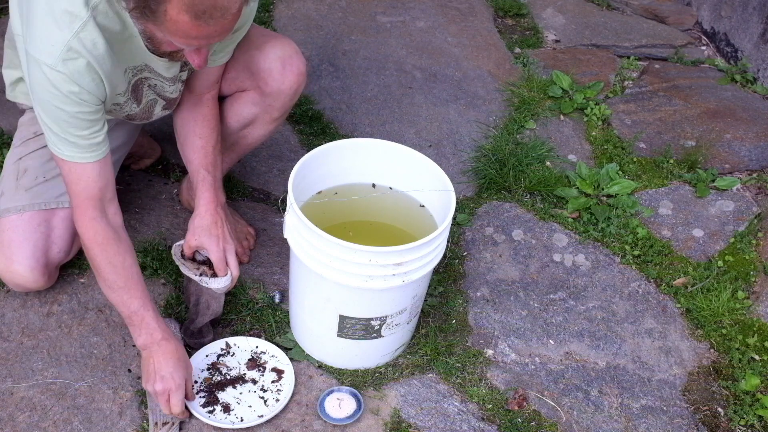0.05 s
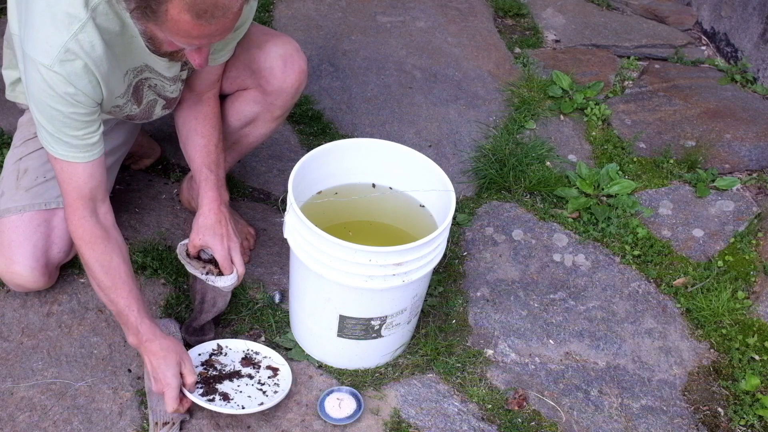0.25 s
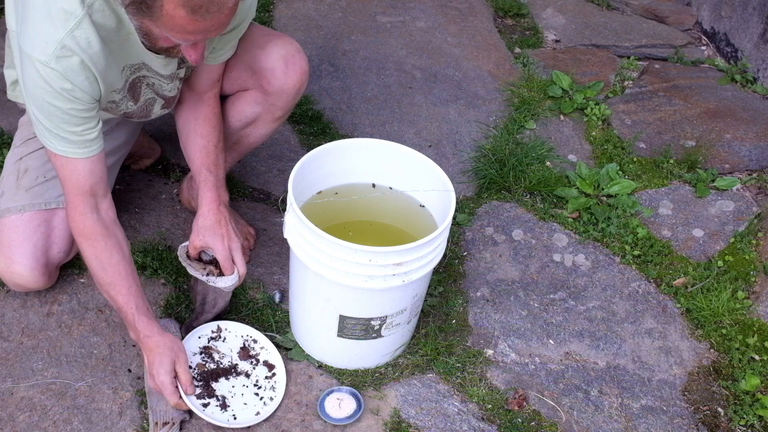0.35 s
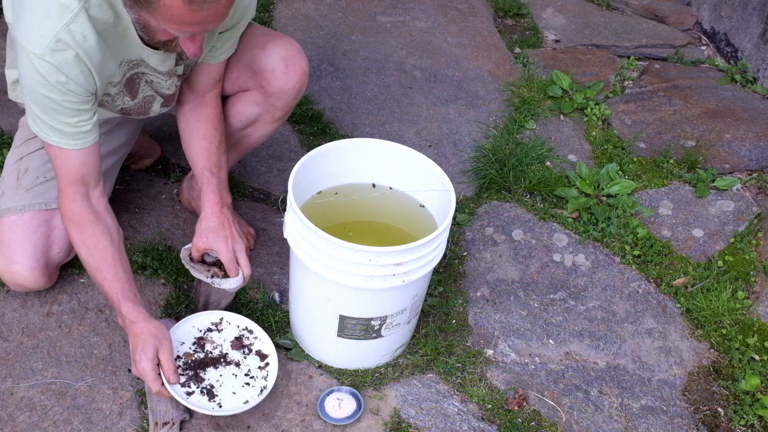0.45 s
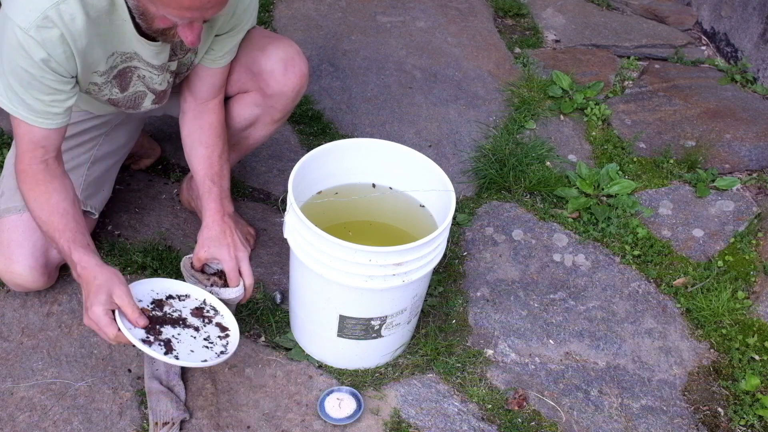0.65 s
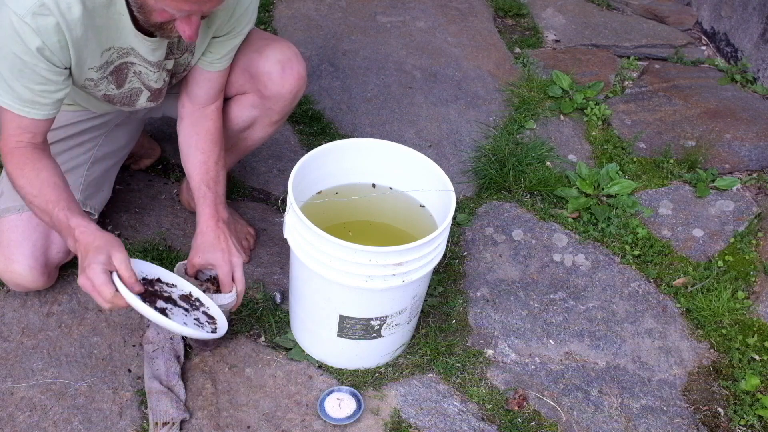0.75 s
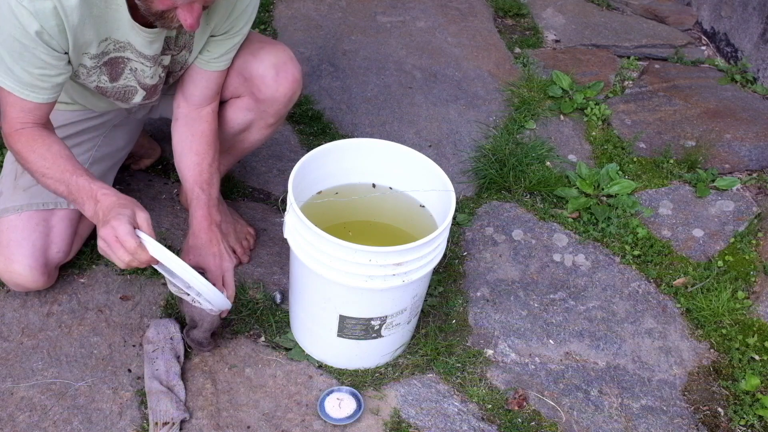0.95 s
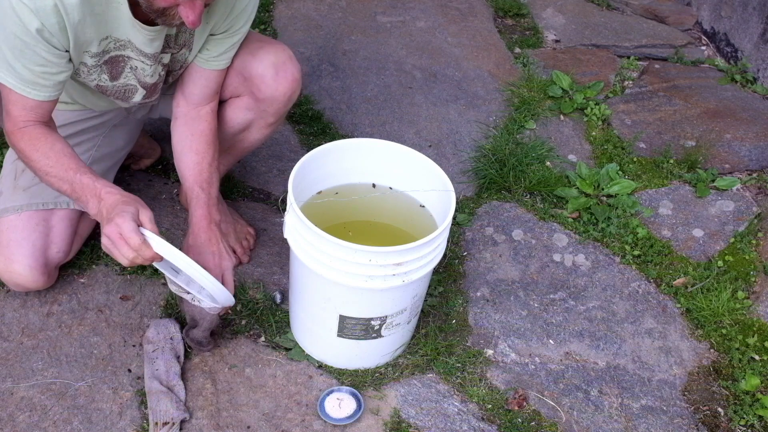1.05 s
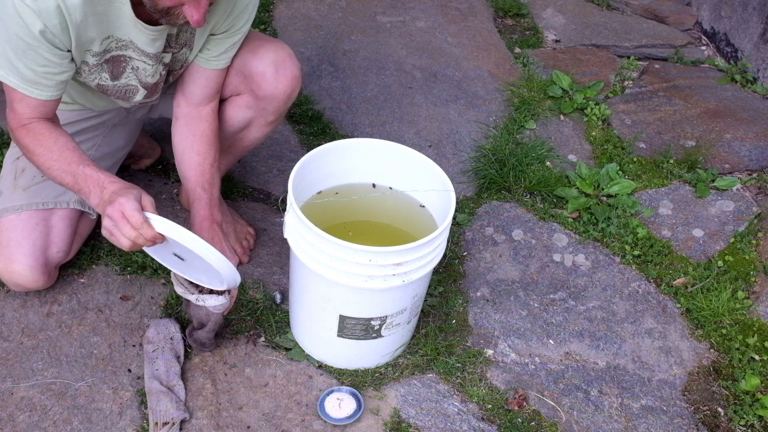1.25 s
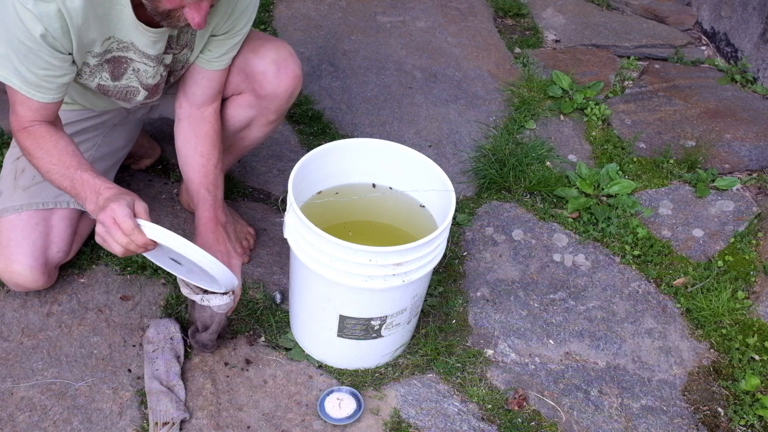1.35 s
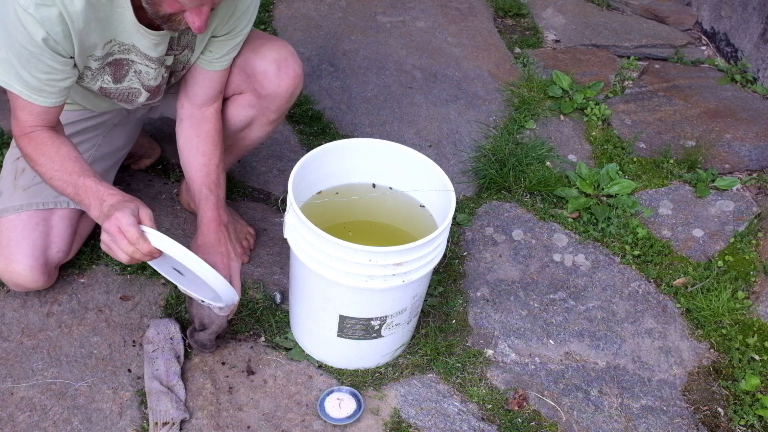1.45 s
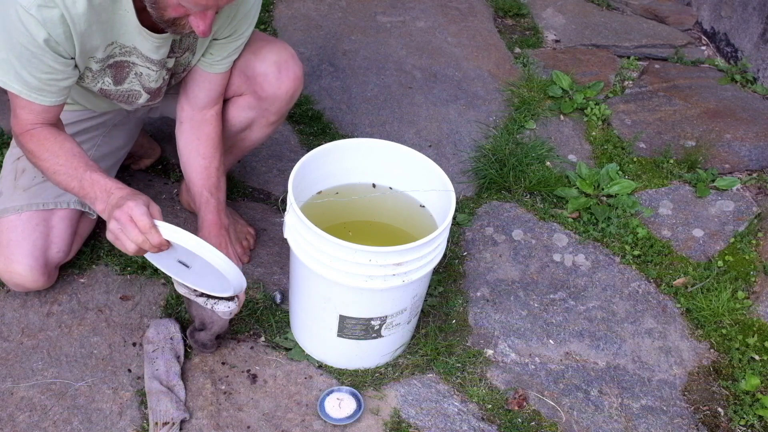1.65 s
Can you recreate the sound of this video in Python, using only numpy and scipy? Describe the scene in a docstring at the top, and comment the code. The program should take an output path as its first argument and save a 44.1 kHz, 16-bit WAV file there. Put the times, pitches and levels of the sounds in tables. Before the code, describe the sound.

A ceramic plate rocks and drags on stone paving, giving a quick cluster of ringing clinks with a gritty scrape. Afterwards, crumbs slide very faintly off it and tick into a plastic cup. Close by, in a quiet garden.

```python
"""Ceramic plate lifted off stone paving.

In a quiet garden the plate rocks and drags on its foot, then tips onto its rim. Each contact gives a dull
knock and restarts its ringing; grit grinds underneath and walls answer faintly. Damp crumbs then slide
off the tilted plate and tick into a plastic cup."""
import sys
import numpy as np
from scipy import signal
from scipy.fft import rfft, irfft
from scipy.io import wavfile

SR = 44100
rng = np.random.default_rng(int(sys.argv[2]) if len(sys.argv) > 2 else 0)


def wav_out(sig):
    """Save sig, one row per channel (or a flat mono array), as 16-bit PCM at SR to the path in sys.argv[1]."""
    wavfile.write(sys.argv[1], SR, np.round(np.clip(np.atleast_2d(sig).T, -1, 1) * 32767).astype(np.int16))


N = 74970
T = np.arange(N) / SR

# Plate on stone, last row a hand gripping the plate: start_s, knock_db, knock_hz, low_ring_db, middle_ring_db,
# high_ring_db, tilt (1 = rim)
CONTACTS = [(0.124, -63, 885, -52, -52, -76, 0.4), (.1432, -24.5, 930, -39.5, -46, -55, 1),
            (0.1526, -25.5, 1300, -38.5, -41, -58, 0.85), (0.1636, -23.5, 860, -75, -45, -60, 0),
            (0.1733, -42, 1100, -39, -40.5, -53, 0.8), (0.216, -21.5, 833, -35.5, -44, -50, 0.03),
            (0.2376, -17.5, 880, -30, -42, -39.5, 0.1), (0.2435, -18, 1500, -28.5, -23, -46.5, 0.77),
            (0.2549, -5, 1110, -21, -31.5, -31, 0.17), (0.2611, -5.5, 1204, -12.5, -22, -39, 0.1),
            (0.2677, -14, 1350, -10.5, -21, -34.5, 0.12), (.284, -7, 1350, -24.5, -25, -40, 0),
            (0.3002, -11, 926, -34, -29.5, -38.5, 0), (0.3073, -22, 1250, -40, -28.5, -77, 0),
            (0.3241, -13.5, 1170, -17.5, -19.5, -33, 0.48), (0.331, -32, 1200, -16.5, -33, -34.5, 0),
            (0.3416, -31, 1000, -26.5, -36, -37.5, 0.11), (0.3618, -15.5, 750, -28, -27, -37.5, 0.45),
            (0.3767, -6.5, 826, -18, -25, -33, 0.6), (0.3901, -12.5, 810, -15, -34, -38, 0.67),
            (0.4107, -14, 810, -23.5, -33.5, -45.5, 0.99), (0.446, -53, 710, -36, -46, -63, 1.0)]
# Upper plate modes: pitch_hz, foot_db, rim_change_db, t60_s, pan_db (left minus right)
HIGH_MODES = [(3682, -26, 8, .1, 5), (4124, -18, 0, .12, 7), (4762, 1, 1, .18, 11), (5540, -18, 5, .18, 8),
              (5900, -16, 1, .15, 10), (7050, -11, 2, .22, 10), (7850, -21, 8, .12, 8),
              (8285, -23, 6, .12, 7), (9378, -18, 8, .15, 7), (10130, -21, 0, .1, 12),
              (10400, -17, 2, .12, 12), (10780, -20, 8, .1, 12), (10970, -19, -2, .14, 12),
              (11746, -20, 7, .12, 12), (12950, -20, 0, .12, 9), (13227, -20, 2, .12, 10),
              (13930, -22, 2, .1, 10), (14160, -27, 7, .1, 10)]


def from_db(db):
    """Decibels to gain."""
    return 10 ** (np.asarray(db) / 20)


def unit_rms(x):
    """Scale to unit power."""
    return x / np.sqrt(np.mean(x ** 2) + 1e-20)


def decay(age_s, t60_s):
    """Exponential fall, 60 dB in t60_s."""
    return np.exp(-np.log(1000) * age_s / t60_s)


def per_bin(curve):
    """Interpolate (freq_hz, value) rows onto the FFT bins, in log frequency."""
    hz, value = np.transpose(curve)
    return np.interp(np.log(np.arange(N // 2 + 1) * SR / N + 1), np.log(hz), value)


def colour(x, spectrum):
    """Shape noise by (freq_hz, level_db) rows, at unit power."""
    return unit_rms(irfft(rfft(x) * from_db(per_bin(spectrum)), N))


def butter(x, hz, kind, order=2):
    """Causal Butterworth filter."""
    return signal.sosfilt(signal.butter(order, hz, kind, fs=SR, output="sos"), x + 1e-18)


def pan(x, pan_db):
    """Place a sound to the left: louder and slightly earlier there."""
    # Left lead between the microphone ports: freq_hz, phase_rad
    left_lead = [(200, 0.017), (1300, 0.42), (4500, 1.03), (11000, 1.56)]
    right = irfft(rfft(x) * np.exp(-1j * per_bin(left_lead)), N)
    gains = from_db([pan_db / 2, -pan_db / 2])
    return np.array([x, right]) * (gains / gains.mean())[:, None]


def grains(rate_per_s=5000, spread_db=2.5):
    """Dense stream of tiny, uneven clicks."""
    sizes = from_db(spread_db * np.minimum(rng.exponential(1, N), 4))
    return sizes * rng.choice([-1, 1], N) * (rng.random(N) < rate_per_s / SR)


def garden_air(level_db=-53):
    """Steady distant outdoor rush, wider in the treble."""
    # Background spectrum: freq_hz, level_db
    spectrum = [(15, -45), (25, -11.5), (152, -3.5), (233, -5), (297, -2), (349, -3.5), (482, -3.5),
                (666, -5.5), (722, -4), (945, -8.5), (1380, -12.5), (1900, -13), (15500, -31)]
    # Left-right likeness: freq_hz, correlation
    likeness = [(30, 0.45), (120, 0.19), (300, 0.56), (700, 0.6), (2000, 0.19), (5000, 0.175), (12000, .1)]
    mid, side = rfft(rng.standard_normal((2, N)))
    correlation = per_bin(likeness)
    stereo = mid + np.sqrt((1 - correlation) / (1 + correlation)) * side * [[1], [-1]]
    return from_db(level_db) * unit_rms(irfft(stereo * from_db(per_bin(spectrum)), N))


def yard_scatter(x, t60_s=0.22, top_hz=3560):
    """Short diffuse tail off paving, bucket and plants."""
    tail = butter(rng.standard_normal((2, N)), top_hz, "low") * decay(T, t60_s)
    tail += 2 * tail.mean(axis=0)  # narrows the image
    tail *= np.sqrt(2 * top_hz / SR / np.sum(tail ** 2, axis=1, keepdims=True))  # passband gain near 1
    return signal.fftconvolve(x.mean(axis=0)[None], tail, axes=1)[:, :N]


def wall_echoes(x, top_hz=2500):
    """Faint, dull returns from three walls."""
    # Reflections: delay_s, gain_db
    walls = [(.105, -27.5), (0.244, -41.5), (0.291, -47)]
    dull = butter(x.mean(axis=0), top_hz, "low")
    return sum(from_db(db) * np.interp(T - delay_s, T, dull) for delay_s, db in walls)


def crumbs():
    """Crumbs slide over the glaze in soft swells and land with thin ticks."""
    # Slides: centre_s, sigma_s, level_db
    slides = [(0.023, 0.017, -61.5), (1.068, 0.036, -59), (1.304, 0.074, -65.5), (1.53, 0.059, -72)]
    # Sliding hiss: freq_hz, level_db
    slide_spectrum = [(500, -42), (2700, 6.5), (6000, -0.5), (9000, -6), (12500, 2.5), (15500, -22)]
    # Landings in the cup: start_s, level_db, t60_s, pitch_hz, width_hz
    ticks = [(0.562, -45.5, 0.12, 13200, 7000), (1.3072, -36, .012, 11400, 1300),
             (1.311, -40.5, .016, 11800, 1300), (1.339, -41, .012, 12500, 2500),
             (1.355, -45, 0.018, 12200, 4000), (1.504, -53, 0.04, 14000, 4000)]
    swells = sum(from_db(db) * np.exp(-.5 * ((T - centre_s) / sigma_s) ** 2)
                 for centre_s, sigma_s, db in slides)
    out = swells * colour(grains(), slide_spectrum)
    for start_s, db, t60_s, hz, width_hz in ticks:
        band = signal.lfilter(*signal.iirpeak(hz, hz / width_hz, fs=SR), rng.standard_normal(N))
        envelope = (T > start_s) * decay(np.abs(T - start_s), t60_s)
        out += .5 * from_db(db) * unit_rms(band) * envelope
    return pan(out, pan_db=12)


def grinding(rub_db=-4.5, rub_width_hz=60, bottom_hz=131, top_hz=14000):
    """Grit is crushed under the dragging plate and rubs its high modes."""
    # Drag strength: time_s, level_db
    drag_curve = [(0.109, -64), (0.126, -54), (0.174, -48), (0.206, -64), (0.236, -43), (0.258, -37.5),
                  (0.269, -46.5), (.318, -44.5), (.336, -40), (.355, -44), (.38, -39), (0.416, -37),
                  (0.439, -64), (0.481, -58)]
    # Crushed grit: freq_hz, level_db
    grit_spectrum = [(60, -26.5), (200, 5.5), (700, 8.5), (1500, -1.5), (2900, 2), (3700, -11.5),
                     (6500, -15.5), (8800, -31), (10500, -11), (12000, -47), (14000, -42), (14800, -61)]
    time_s, drag_db = np.transpose(drag_curve)
    drag = from_db(np.interp(T, time_s, drag_db)) * (T > time_s[0]) * (T < time_s[-1])
    crush = grains()
    rub = np.zeros(N)
    for hz, foot_db, rim_change_db, *_ in HIGH_MODES:
        gain = from_db((foot_db + rim_change_db / 2) / 2)  # half tilt, dB contrast halved
        rub += gain * signal.lfilter(*signal.iirpeak(hz, hz / rub_width_hz, fs=SR), crush)
    grit = drag * (colour(crush, grit_spectrum) + from_db(rub_db) * unit_rms(rub))
    grit = butter(grit, top_hz, "low", order=12)
    return pan(butter(grit, bottom_hz, "high"), pan_db=5.5)


def knocks(edge_ratio=1.485, bottom_hz=140, top_hz=2550):
    """Each contact pushes out one short, dull pulse of air."""
    out = np.zeros(N)
    for start_s, db, hz, *_ in CONTACTS:
        impulse = signal.unit_impulse(N, int(start_s * SR))
        pulse = butter(impulse, [hz / edge_ratio, hz * edge_ratio], "band")
        pulse = butter(pulse, top_hz, "low", order=4)
        out += from_db(db) * pulse / np.abs(pulse).max()
    return pan(butter(out, bottom_hz, "high"), pan_db=1)  # a small plate radiates no bass


def ringing(rise_s=0.00035, spread_db=1, jolt_rad=0.37):
    """Each contact resets every mode's swing and jolts its phase; between contacts the modes decay."""
    # Low and middle plate modes: pitch_hz, foot_db, rim_change_db, t60_s, pan_db
    low_modes = [(989, -28.5, 31.5, 0.2, 3.5), (1076, -23, -3, .1, 16), (1347.3, 1, 1, 0.17, 4.5)]
    middle_modes = [(2359, 3, -23.5, 0.26, 3), (2681.7, -1.5, 4, 0.12, 8.2), (2722, -13, 18, 0.075, 7.1)]
    start_s, _, _, low_db, middle_db, high_db, tilt = np.transpose(sorted(CONTACTS))
    latest = np.maximum(np.searchsorted(start_s, T) - 1, 0)
    age_s = np.maximum(T - start_s[latest], 0)
    pole = np.exp(-1 / (rise_s * SR))
    lowest_hz = low_modes[0][0]
    out = np.zeros((2, N))
    for modes, strike_db in ((low_modes, low_db), (middle_modes, middle_db), (HIGH_MODES, high_db)):
        for hz, foot_db, rim_change_db, t60_s, pan_db in modes:
            level_draw, phase_draw = rng.standard_normal((len(start_s), 2)).T
            strength = from_db(strike_db + foot_db + rim_change_db * tilt + spread_db * level_draw)
            phase_rad = np.cumsum(jolt_rad * np.sqrt(hz / lowest_hz) * phase_draw)
            swing = (strength * np.exp(1j * phase_rad))[latest] * (T > start_s[0]) * decay(age_s, t60_s)
            swing = signal.lfilter([1 - pole], [1, -pole], swing)
            out += pan(np.imag(swing * np.exp(2j * np.pi * hz * T)), pan_db)
    return out


def scene():
    """Plate with scatter and echoes, crumbs and garden air."""
    contact = knocks() + grinding()
    ring = ringing()
    scatter = yard_scatter(from_db(-7) * contact + from_db(-9.5) * ring)
    return contact + ring + scatter + wall_echoes(ring) + crumbs() + garden_air()


def record(dry):
    """Steep low-pass at 15.5 kHz."""
    return signal.sosfilt(signal.ellip(10, .1, 80, 15500, fs=SR, output="sos"), dry)


dry = scene()
out = record(dry)
wav_out(out)
```